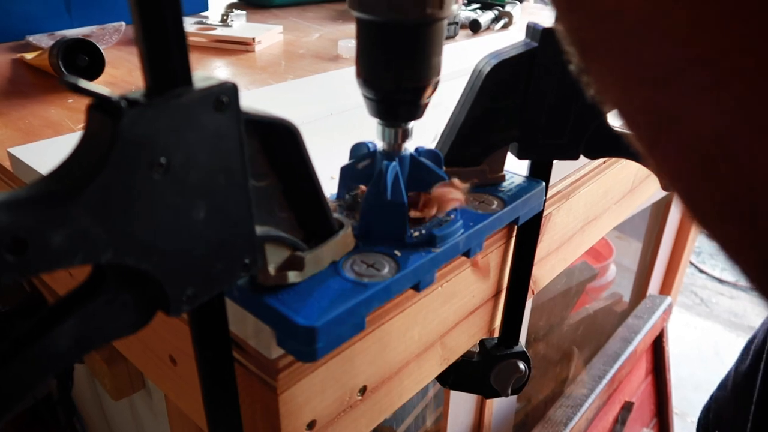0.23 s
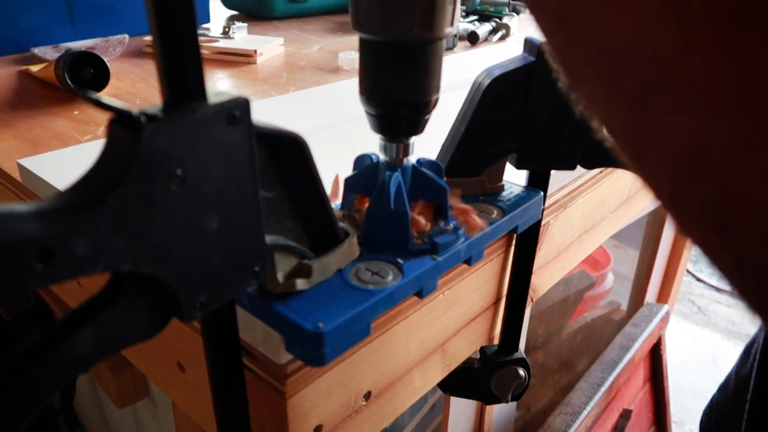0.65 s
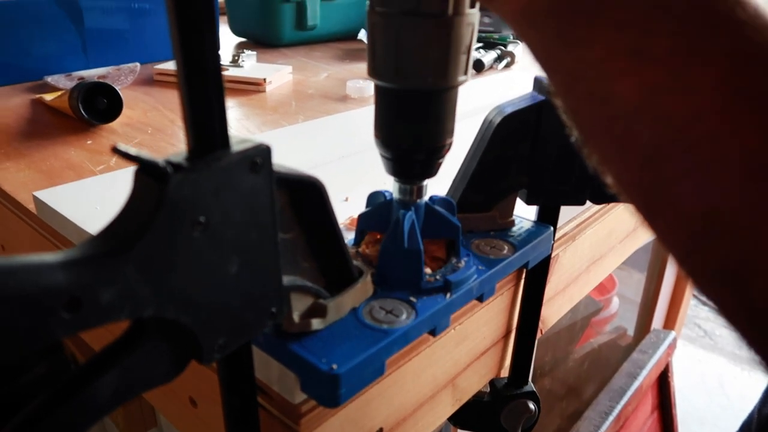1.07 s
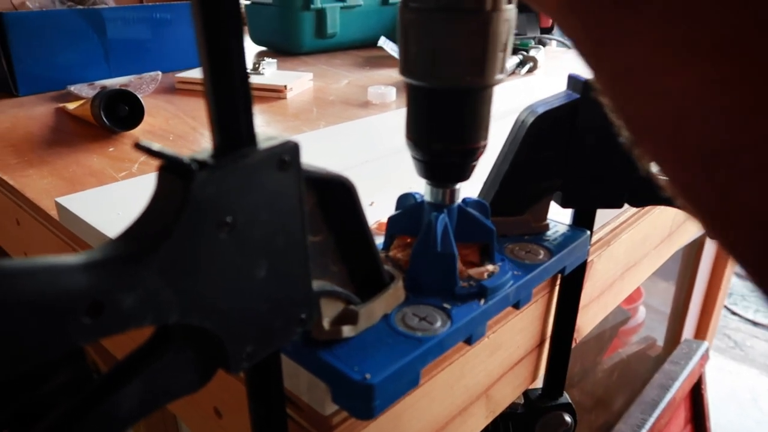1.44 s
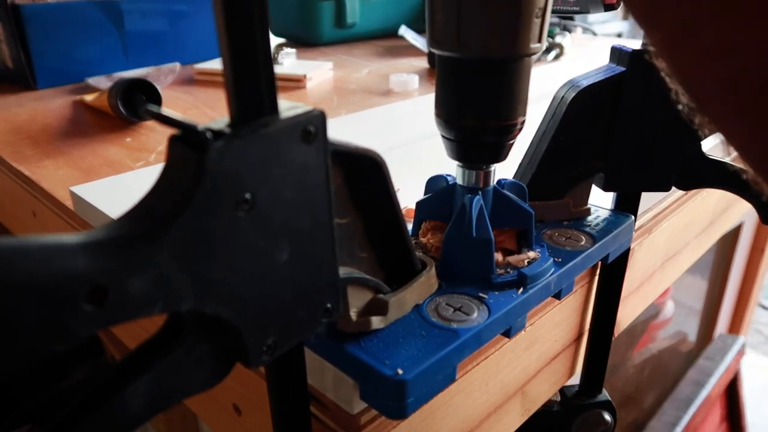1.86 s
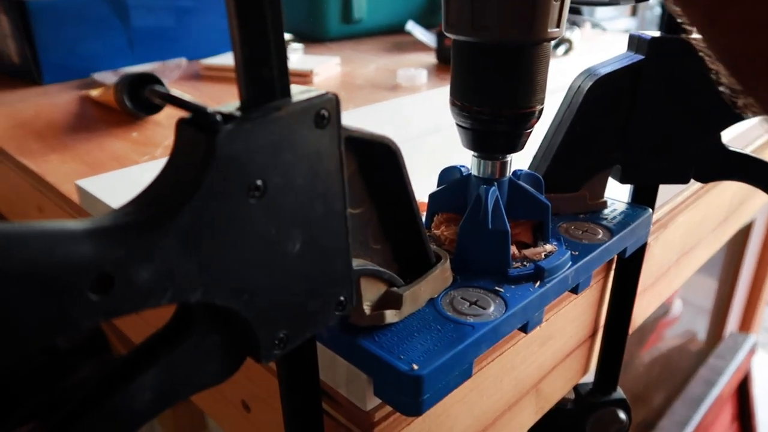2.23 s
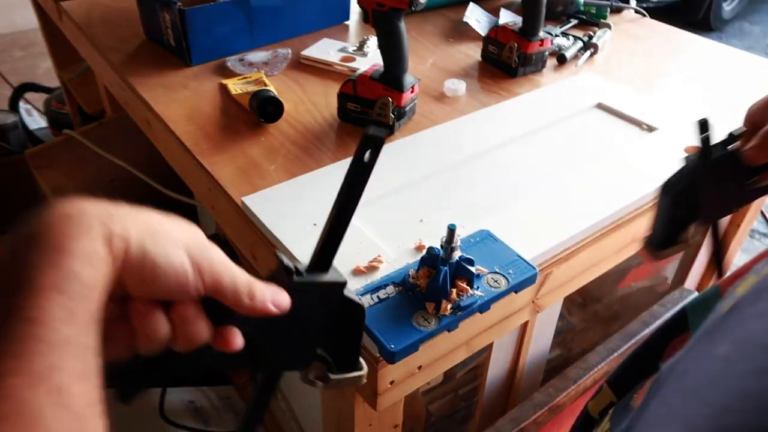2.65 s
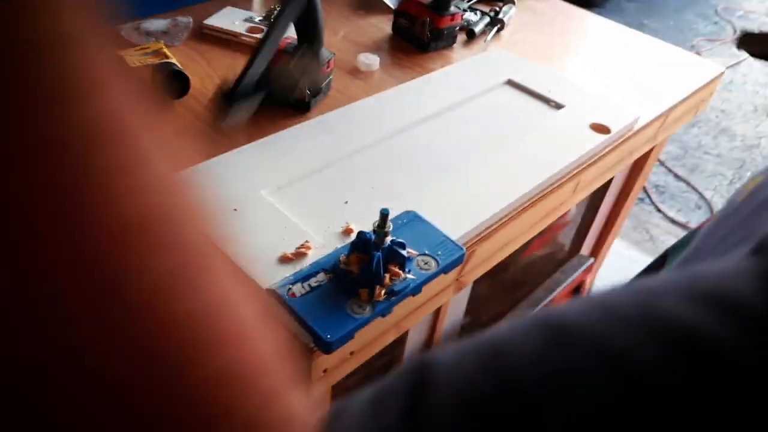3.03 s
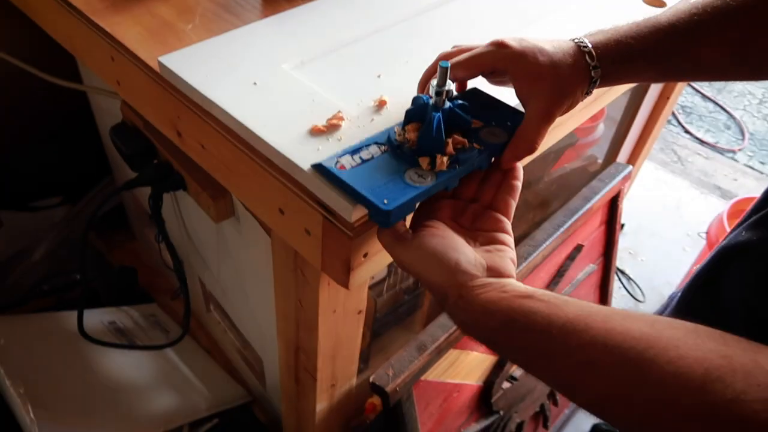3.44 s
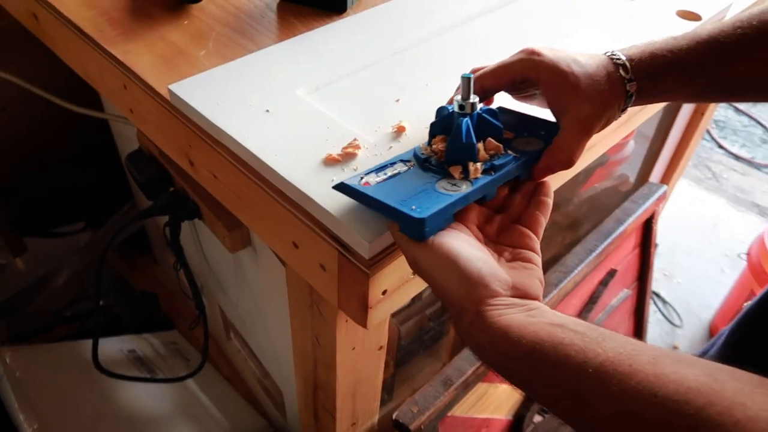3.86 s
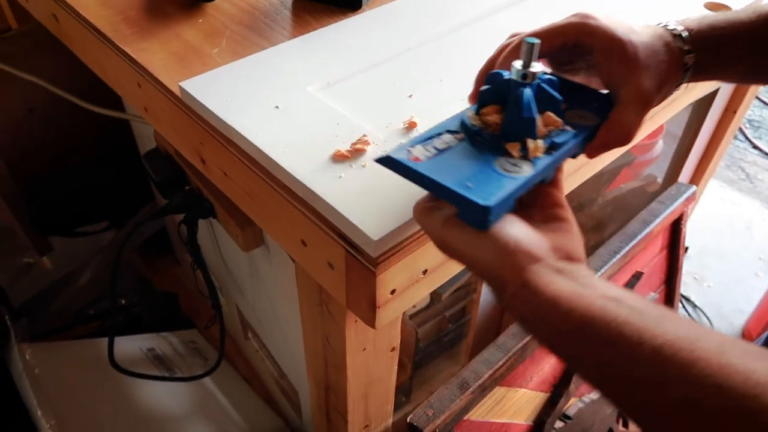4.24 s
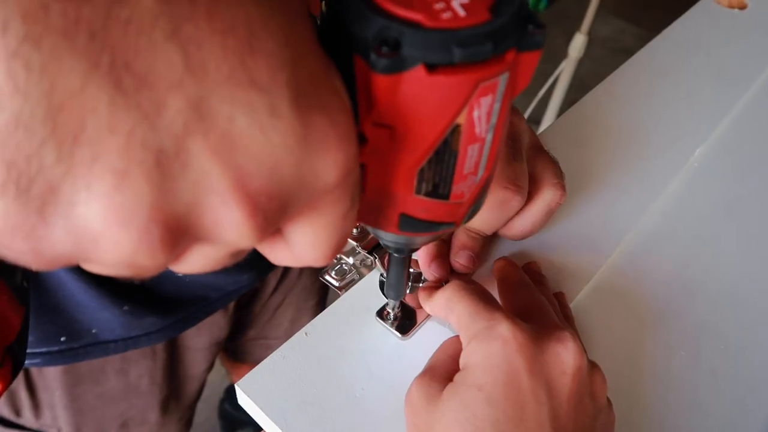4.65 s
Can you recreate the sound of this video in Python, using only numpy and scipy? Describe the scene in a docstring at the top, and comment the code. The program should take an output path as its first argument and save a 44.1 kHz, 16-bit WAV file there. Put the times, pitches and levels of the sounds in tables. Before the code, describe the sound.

From the start, a power drill bores into a wooden door very close to the microphone: a rough mid-range growl with fluttering gear whine, snapping fibres, bright crackling chips and a drumming panel. It is shrillest in the first half second. Uneven bites several times a second drag the pitch down and let it spring back. From about 1.8 seconds the push eases and the motor climbs; at 2.23 it brakes and stops dead. A quiet workshop remains, with low rumble, faint hum and a brief soft hiss around 2.6. At 3.3 to 3.5 a plastic jig scrapes, bumps the bench softly and squeaks; a clear knock lands at 3.78, then faint contacts and a slide near 4.4. At 4.45 bit clicks begin, a driver starts at 4.51, and a very sharp click hits at 4.65. Its humming rotor, rattle and surging gear howl continue to the end, with short reflections.

```python
"""A drill growls and whines as its cutter bores a hinge cup into a wooden door, close by in a workshop.
Each bite drags the motor and its gear tones down; snapping grains make the cut; eased off, it stops dead.
Then a plastic jig scrapes, squeaks and knocks on the door: shaped grains, trembling tones and struck modes.
Last, a driver starts on a hinge screw: howling gear tones, rotor hum, rattle and clicks of the bit.
Low rumble, hum and hiss lie beneath; short reflections surround the tools and hands."""
import sys
import numpy as np
from scipy import signal
from scipy.fft import rfft, irfft
from scipy.io import wavfile

SR = 44100
rng = np.random.default_rng(int(sys.argv[2]) if len(sys.argv) > 2 else 0)


def materialize(psi):
    """Save the field psi as 16-bit PCM at rate SR to the path in sys.argv[1].

    A 1-D psi becomes a single channel; in a 2-D psi each row is a channel.
    """
    bounded = np.clip(np.atleast_2d(psi).T, -1, 1)
    quanta = np.round(bounded * 32767).astype(np.int16)
    wavfile.write(sys.argv[1], SR, quanta)


N = 211225
TIME = np.arange(N) / SR

# Likeness of left and right over the spectrum. Each row: frequency in Hz, likeness as a share.
LIKENESS = [(160, 1), (600, 0.99), (1200, 0.98), (2500, 0.92), (4500, 0.86), (8000, 0.44), (13000, 0.26)]

IDLE_HZ = 809  # drill motor with no load
FIRM_LOAD = 0.31  # share of idle speed lost under a firm push


def gain_of(db):
    """Decibels to amplitude."""
    return 10 ** (np.asarray(db) / 20)


def evened(x):
    """Scaled to rms 1."""
    return x / np.sqrt(np.mean(x ** 2) + 1e-20)


def read(points, hz):
    """Reads a spectrum table on a log-frequency axis."""
    f, value = np.transpose(points)
    return np.interp(np.log(hz + 1), np.log(f + 1), value)


def ramp(start_s, length_s):
    """Rises from 0 to 1, then holds."""
    return np.clip((TIME - start_s) / length_s, 0, 1)


def since(start_s):
    """Seconds since a moment, 0 before it."""
    return np.maximum(TIME - start_s, 0)


def swell(s, half_s):
    """A smooth rise and fall around a moment, peak 1."""
    return np.exp(-np.minimum(((TIME - s) / half_s) ** 2, 60))


def drift(rate_hz):
    """Smooth random wander of rms 1; the rate sets where its spectrum falls away."""
    hz = np.fft.rfftfreq(N, 1 / SR)
    return evened(irfft(rfft(rng.standard_normal(N)) * np.exp(-(hz / rate_hz) ** 2), N))


def noise():
    """Two unrelated white noises."""
    return rng.standard_normal((2, N))


def grains(per_s, spread_db):
    """Random tiny snaps of uneven size, unrelated left and right."""
    size = gain_of(spread_db * np.minimum(rng.exponential(1, (2, N)), 4))
    present = rng.random((2, N)) < per_s / SR
    return evened(size * np.sign(noise()) * present)


def tone(hz, waver_hz, rate_hz):
    """A sine of rms 1 whose pitch trembles."""
    cycles = np.cumsum(hz + waver_hz * drift(rate_hz)) / SR
    return np.sqrt(2) * np.sin(2 * np.pi * (cycles + rng.random()))


def widened(a, b, same):
    """Mixes two unrelated spectra into left and right that are alike by the given share."""
    mid, side = a * np.sqrt(1 + same), b * np.sqrt(1 - same)
    return np.array([mid + side, mid - side])


def coloured(pair, spectrum, resonances=(), diffuse=1):
    """Gives two unrelated drives a spectrum, resonant peaks and stereo width; diffuse = less alike."""
    hz = np.fft.rfftfreq(N, 1 / SR)
    a, b = rfft(pair)
    same = np.clip(read(LIKENESS, hz), 0, 1) ** abs(diffuse)
    shape = gain_of(read(spectrum, hz))
    if len(resonances):
        peaks = sum(gain_of(db) / (1 + 2j * (hz - f) / width) ** 2 for f, width, db in resonances)
        shape = 0.73 * shape + 0.59 * peaks
    return evened(irfft(widened(a, b, same) * shape, N))


def bursts(rows, waver_hz, rate_hz, rough_db):
    """One rough, trembling tone swells and fades at each row, gliding in pitch if the row says so."""
    levels = np.array([gain_of(db) * swell(s, half_s) for s, db, half_s, *pitch in rows])
    pitches = np.array([hz + sum(glide) * np.clip(TIME - s, -2 * half_s, 2 * half_s)
                        for s, db, half_s, hz, *glide in rows])
    level = levels.sum(0)
    pitch_hz = (pitches * levels).sum(0) / level  # the loudest burst rules the pitch
    return level * evened(tone(pitch_hz, waver_hz, rate_hz) * gain_of(rough_db * drift(rate_hz)))


def add(mix, s, sound):
    """Adds a sound at a time."""
    part = mix[:, round(s * SR):][:, :sound.shape[1]]
    part += sound[:, :part.shape[1]]


def strike(rows, modes, crack, crack_s, width, focus_db):
    """Each blow rings one object's modes and a short noisy crack; its brightness sets which band speaks."""
    out, t = np.zeros((2, N)), np.arange(SR // 4) / SR
    hz, db, t60 = np.transpose(modes)[:, :, None]
    bins = np.fft.rfftfreq(len(t), 1 / SR) + 1
    for s, level_db, bright_hz in rows:
        phase = 2 * np.pi * rng.random(hz.shape) + width * rng.standard_normal((2, *hz.shape))
        decay = gain_of(db - focus_db * np.log2(hz / bright_hz) ** 2 - 60 * t / t60)
        ring = (decay * np.sin(2 * np.pi * hz * t + phase)).sum(1)
        contact = rng.standard_normal(len(t)) + width * rng.standard_normal((2, len(t)))
        band = gain_of(-focus_db * np.log2(bins / bright_hz) ** 2)
        contact = evened(irfft(rfft(contact) * band, len(t)))
        blow = ring / abs(ring).max() + crack * contact * np.exp(-t / crack_s)
        blow = blow * (1 - np.exp(-t / 0.000098))  # soften the very first edge
        add(out, s, gain_of(level_db) * blow / abs(blow).max())
    return out


def workshop():
    """Low rumble and a wavering hum come up at about 2.4 s; a soft hiss swells and fades."""
    # Rumble spectrum. Each row: frequency in Hz, density in dB per Hz.
    air = [(15, -58), (25, -26.5), (54, -7), (82, -12), (119, 0), (151, -13), (208, -12.5), (257, -14.5),
           (293, -15), (666, -25.5), (722, -24.5), (1260, -30.5), (1470, -34), (8930, -48.5),
           (14000, -83.5)]
    # Hum tones. Each row: frequency in Hz, level in dB before the trim below.
    hum_tones = [(107, -62.5), (205, -57.5)]
    # Hiss spectrum. Each row: frequency in Hz, density in dB per Hz.
    hiss = [(240, -28), (400, -1.5), (747, -7), (829, -7), (2250, -8.5), (2420, -10), (3840, -7.5),
            (6090, -21), (12600, -29.5), (14000, -34.5)]
    room_db, room_start_s, room_rise_s, room_under_db = -53, 2.374, 0.12, -17.5
    hiss_start_s, hiss_rise_s, hiss_db, hiss_fade_s, hiss_rest_db = 2.307, 0.26, -55.5, 0.21, -70
    hum_trim_db = -1.0

    level = gain_of(room_under_db * (1 - ramp(room_start_s, room_rise_s)))
    hum = sum(gain_of(db + hum_trim_db) * tone(hz, 2.534, 14.2) for hz, db in hum_tones)
    rumble = gain_of(room_db) * coloured(noise(), air, diffuse=34.0)
    fade = np.exp(-since(hiss_start_s + hiss_rise_s) / hiss_fade_s)
    passing = gain_of(hiss_db) * ramp(hiss_start_s, hiss_rise_s) ** 2 * fade
    hiss_level = passing + gain_of(hiss_rest_db) * level
    return (rumble + hum) * level + coloured(noise(), hiss, diffuse=24.0) * hiss_level


def walls(x):
    """Dense reflections, each band dying at its own speed, most alike left and right in the bass."""
    # Decay of the room. Each row: frequency in Hz, time to fall by 60 dB in seconds.
    decay_times = [(150, 0.56), (600, 0.25), (2500, 0.21), (6000, 0.181), (12000, 0.13)]
    taps = rng.standard_normal((2, SR // 2)) * (rng.random((2, SR // 2)) < .08)
    taps[:, :round(.004 * SR)] = 0  # gap in seconds before the first reflection
    hz, t, (a, b) = signal.stft(taps, SR, nperseg=256)
    same = np.clip(read(LIKENESS, hz), 0, 1)[:, None] ** 3
    bands = widened(a, b, same) * gain_of(-60 * t / read(decay_times, hz)[:, None])
    tail = signal.istft(bands, SR, nperseg=256)[1]
    return signal.fftconvolve(x, tail / np.linalg.norm(tail[0]), axes=1)[:, :N]


def bench_bumps():
    """The door bumps on the bench: soft, low blows ring the bench modes."""
    # Bumps. Each row: time in seconds, peak in dB, brightest frequency in Hz.
    bumps = [(3.380, -35, 290), (3.394, -39, 300), (3.409, -43, 280)]
    # Bench modes. Each row: frequency in Hz, relative level in dB, time to fall by 60 dB in seconds.
    bench = [(141, 8.5, 0.15), (228, 2.5, 0.14), (276, 8, 0.048), (390, -3, .09), (520, -15, .06)]
    return strike(bumps, bench, crack=0.11, crack_s=0.0084, width=.05, focus_db=5.0)


def jig_scrape():
    """The jig slides under the hands: sparse grains ring its hollow while a stroke lasts."""
    # Strokes. Each row: start in seconds, length in seconds, level in dB.
    slides = [(3.27, 0.089, -50), (3.455, 0.033, -55), (3.605, 0.029, -59.5), (3.685, 0.056, -59.5),
              (3.746, 0.1, -63), (4.39, 0.16, -60)]
    # Scrape spectrum. Each row: frequency in Hz, density in dB per Hz.
    scrape = [(240, 3), (400, 1.5), (829, -8.5), (891, -11), (1440, -6), (2170, -8.5), (3100, -9),
              (4200, -17.5), (5120, -25), (6500, -26), (8000, -30), (13000, -35)]
    # Hollow ring of the jig. Each row: frequency in Hz, width in Hz, level in dB.
    hollow = [(1508, 280, -5), (1912, 190, -8), (3040, 450, -14)]
    attack_s, release_s = 0.02, 0.018
    strokes = sum(gain_of(db) * ramp(s, attack_s) * np.exp(-since(s + length) / release_s)
                  for s, length, db in slides)
    return coloured(grains(870, 2.6), scrape, hollow, diffuse=2.4) * strokes * gain_of(2.0 * drift(90))


def jig_squeak():
    """Plastic sticks and slips on the door for a moment: rough tones with a trembling pitch."""
    # Squeak tones. Each row: frequency in Hz, level in dB.
    squeak_tones = [(1650, -61), (3700, -69)]
    start_s, length_s = 3.474, 0.029
    level = ramp(start_s, 0.0032) * np.exp(-since(start_s + length_s) / 0.0068)
    return level * sum(gain_of(db + 5.2 * drift(120)) * tone(hz, 0.049 * hz, 416) for hz, db in squeak_tones)


def jig_knocks():
    """The jig knocks on the door: each contact rings the plastic's modes."""
    # Knocks. Each row: time in seconds, peak in dB, brightest frequency in Hz.
    knocks = [(2.427, -53.5, 2200), (3.282, -46, 1515), (3.295, -51, 3070), (3.367, -52, 7040),
              (3.374, -45, 1410), (3.712, -48, 1500), (3.7805, -28, 1870), (3.786, -33, 1250),
              (3.798, -44, 1690), (3.912, -45.5, 1990), (4.34, -50, 1782)]
    # Modes of the jig on the door. Each row: frequency in Hz, relative level in dB, 60 dB decay in seconds.
    jig = [(681, 19, 0.067), (827, 0, 0.071), (1074, 3, 0.038), (1243, -2, 0.064), (1450, 5, 0.049),
           (1660, -3, 0.063), (1820, 2, 0.04), (2040, -3, 0.047), (2350, -3, 0.027), (2800, -11, 0.027),
           (3460, -3, 0.048)]
    return strike(knocks, jig, crack=0.39, crack_s=0.0021, width=0.27, focus_db=13)


def handling():
    """Hands shift the jig on the door, and the door bumps on the bench."""
    return jig_scrape() + jig_squeak() + jig_knocks() + bench_bumps()


def bit_clicks():
    """The bit clicks in the screw head: hard blows ring the steel very briefly."""
    # Clicks. Each row: time in seconds, peak in dB, brightest frequency in Hz.
    clicks = [(4.4495, -23, 5000), (4.518, -33, 3200), (4.5555, -20.5, 3800), (4.5558, -25, 10300),
              (4.6472, -10, 5060), (4.6478, -16, 2600), (4.6488, -11.5, 1500)]
    # Modes of bit and hinge. Each row: frequency in Hz, relative level in dB, 60 dB decay in seconds.
    steel = [(1430, -2, 0.016), (2920, -21, .014), (3590, 2, 0.015), (4100, 9.5, 0.0082),
             (5430, -10, 0.029), (6000, -1, 0.016), (7350, -24, 0.011), (8660, -16, .014),
             (10940, 5, 0.017)]
    return strike(clicks, steel, crack=0.67, crack_s=0.0018, width=0.49, focus_db=14.5)


def driver_whistle():
    """The speed controller whistles, one note for each trigger step."""
    # Trigger steps. Each row: start in seconds, pitch in Hz, level in dB.
    trigger_steps = [(4.512, 7970, -56.5), (4.668, 7800, -51)]
    step_s, step_hz, step_db = np.transpose(trigger_steps)
    step = np.maximum(np.searchsorted(step_s, TIME) - 1, 0)
    return gain_of(step_db[step]) * tone(step_hz[step], 23.9, 30.3)


def driver_rotor(speed, start_s):
    """The rotor hums in tones tied to its speed, dipping as the bit unseats once a turn."""
    # Rotor tones. Each row: frequency at full speed in Hz, relative level in dB.
    rotor_tones = [(104, -20), (154, -2.5), (204.6, 5.5), (231, -4.5), (307, -4), (614, -10)]
    level_db, delay_s, attack_s = -32, 0.035, 0.023
    dip_s, dip_rate_hz, dip_depth = 4.585, 22.2, 0.59  # moment of a dip, dips per second, share lost
    hum = evened(sum(gain_of(db) * tone(hz * speed, 0.0259 * hz, 55.4) for hz, db in rotor_tones))
    seated = 1 - dip_depth * np.cos(np.pi * dip_rate_hz * (TIME - dip_s)) ** 4
    return hum * seated * gain_of(level_db + 1.8 * drift(42)) * ramp(start_s + delay_s, attack_s)


def driver_rattle(speed, howl):
    """Dense grains pulse once per rotor turn, louder when the screw binds and fluttering at random."""
    # Rattle spectrum. Each row: frequency in Hz, density in dB per Hz.
    rattle = [(53, -51), (100, -5.5), (210, -16), (400, -15), (603, -26), (714, -22), (901, -16),
              (1070, -24), (1210, -12.5), (1500, -4), (2010, -19.5), (2760, -11.5), (5910, -28.5),
              (7950, -28.5), (14100, -46.5)]
    level_db, bind_db, flutter_db = -32, 1.5, 1.5
    turn = np.cumsum(204.6 * speed) / SR % 1  # position within a turn; full-speed rate in Hz
    pulsed = grains(9000, 0.96) * (1.0 + np.exp(-turn / 0.14))
    level = gain_of(level_db + bind_db * howl / howl.max() + flutter_db * drift(88))
    return level * coloured(pulsed, rattle)


def driving():
    """The driver comes in at about 70% speed and climbs quickly; its gears howl whenever the screw binds."""
    # Gear tones. Each row: frequency at full speed in Hz, relative level in dB.
    gear_tones = [(1244, -4.5), (1305, -6), (1424, -20), (1486, -5), (1534, 6.5), (1583, -2), (1635, -0.5)]
    # Surges as the screw binds. Each row: time in seconds, level in dB, half-length in seconds.
    surges = [(4.54, -32, 0.0046), (4.596, -28, .015), (4.627, -36, 0.0047), (4.668, -24.5, .0037),
              (4.682, -26.5, 0.0065), (4.749, -24, 0.01), (4.779, -29, 0.025)]
    start_s, climb_s, start_slow = 4.512, .018, 0.24  # start_slow: share of full speed, soon made up
    creep_per_s = .17  # share of full speed gained per second
    calm_db, attack_s = -37, 0.016  # gears between surges; build-up of gears and rattle

    running = since(start_s)
    speed = 1 - start_slow * np.exp(-running / climb_s) - creep_per_s * (running[-1] - running)
    howl = gain_of(calm_db) + sum(gain_of(db) * np.exp(-((TIME - s) / half_s) ** 2) for s, db, half_s in surges)
    gears = howl * evened(sum(gain_of(db) * tone(hz * speed, 9, 70) for hz, db in gear_tones))
    build_up = (1 - np.exp(-running / attack_s)) ** 2
    geared = (gears + driver_rattle(speed, howl)) * build_up
    return geared + driver_rotor(speed, start_s) + driver_whistle() * (running > 0)


def drill_controller(motor_hz, braked):
    """The speed controller's switching tone and its motor-spaced sidebands rise slowly, then cut out."""
    # Switching tone: frequency in Hz, full level in dB.
    switch_hz, switch_db = (7927, -57)
    # Sidebands. Each row: distance in motor frequencies, full level in dB.
    sidebands = [(0.98, -52.5), (-1, -81)]
    carrier = gain_of(switch_db) * tone(switch_hz, 1.5, 30)
    sides = sum(gain_of(db + 2 * drift(39.85)) * tone(switch_hz + k * motor_hz, 2.7, 60) for k, db in sidebands)
    return (carrier + sides) * ramp(0, .85) ** 2 * gain_of(-900 * braked)


def cutting():
    """The motor frequency between bites, and the share of it that the cutter's lips take as they bite."""
    # How hard the drill is pushed. Each row: time in seconds, motor frequency between bites in Hz.
    feed = [(0.0, 487), (0.015, 532), (0.04, 523), (0.09, 453), (0.17, 454), (0.24, 431), (0.33, 426),
            (0.39, 528), (0.53, 530), (0.64, 553), (0.73, 584), (0.83, 565), (0.93, 553), (1.1, 556),
            (1.19, 600), (1.29, 605), (1.41, 570), (1.59, 533), (1.77, 511), (1.825, 607), (1.9, 650),
            (1.98, 685), (2.08, 714), (2.2, 723)]
    # Bites of a cutter lip. Each row: time in seconds, share of speed lost, half-length in seconds.
    bites = [(0.064, 0.136, 0.013), (0.13, 0.193, 0.018), (0.204, 0.179, 0.016), (0.282, 0.127, 0.022),
             (0.379, 0.147, 0.008), (0.414, 0.106, 0.009), (0.454, 0.169, 0.011), (0.498, 0.184, 0.017),
             (0.565, 0.274, 0.015), (0.676, 0.206, 0.015), (0.785, 0.227, 0.017), (0.854, 0.06, 0.01),
             (0.901, 0.209, 0.017), (0.959, 0.092, 0.017), (1.014, 0.22, 0.014), (1.076, 0.06, 0.014),
             (1.125, 0.158, 0.014), (1.233, 0.173, 0.016), (1.437, 0.188, 0.015), (1.498, 0.049, 0.012),
             (1.553, 0.257, 0.017), (1.612, 0.166, 0.017), (1.677, 0.252, 0.014), (1.738, 0.077, 0.011),
             (1.851, 0.097, 0.017), (1.934, 0.045, 0.023), (2.026, 0.033, 0.019), (2.25, 0.156, 0.031)]
    s, hz = np.transpose(feed)
    drag = sum(share * swell(bite_s, half_s) for bite_s, share, half_s in bites)
    return np.interp(TIME, s, hz), drag


def door_thump(load, braked):
    """Deep thumping of the door, strong only under a firm push."""
    # Thump spectrum. Each row: frequency in Hz, density in dB per Hz.
    thump = [(30, -34), (62, -20), (100, 3), (125, -4), (220, -28.5), (500, -90.5)]
    firmness = np.clip(load / FIRM_LOAD, 0, 1) ** 2
    return coloured(noise(), thump) * firmness * gain_of(-55 - 314 * braked)


def door_drum(motor_hz, flutter):
    """Snapping fibres drum the clamped door; the motor's hum rings it wherever it meets a resonance."""
    # Cut heard through the door. Each row: frequency in Hz, density in dB per Hz.
    door = [(59, -36.5), (100, -24.5), (135, -26.5), (161, -7), (254, -7.5), (351, -1), (389, -8.5),
            (537, 0), (611, -5.5), (661, -3.5), (856, -10), (1280, -13), (1380, -10.5), (1980, -15.5),
            (2200, -9.5), (2860, -28), (4840, -120)]
    # Ringing of the door. Each row: frequency in Hz, width in Hz, level in dB.
    panel = [(180, 35, -11), (217.3, 25, -11), (353, 41, -9), (542, 110, -6), (657.6, 31, -7.5),
             (980, 180, -17), (1395, 40, -11.5)]
    # Shaking of the drill. Each row: multiple of the motor frequency, relative level in dB.
    shaft = [(.25, -23.5), (.335, -26)]
    motor_db = -7.5
    shake = sum(gain_of(db) * tone(k * motor_hz, 11.0, 47.9) for k, db in shaft)
    ringing = sum(gain_of(db) / (1 + (2 * (motor_hz - hz) / width) ** 2) for hz, width, db in panel)
    shake = shake + gain_of(motor_db) * ringing * tone(motor_hz, 6, 50)
    return 1.192 * coloured(grains(3500, 1.0) * flutter, door, panel) + shake


def door_judder():
    """The door judders under the cutter in low trembling tones."""
    # Judders. Each row: time in seconds, level in dB, half-length in seconds, pitch in Hz.
    judders = [(.024, -27.5, 0.013, 527.5), (.122, -28, 0.015, 525.4), (.169, -30.5, 0.0078, 526.5),
               (.252, -22.5, 0.011, 535), (.345, -25, .011, 551.8), (.408, -29, 0.014, 599.3),
               (.515, -31, 0.027, 656), (.574, -25.5, 0.013, 555), (.76, -33.5, 0.025, 532.6),
               (.96, -32.5, 0.033, 560), (1.362, -28.5, .012, 530), (1.473, -28.5, .011, 531),
               (1.56, -33, .022, 560), (1.67, -33.5, 0.018, 345), (1.705, -31, .016, 555),
               (1.742, -33, .016, 652)]
    return bursts(judders, waver_hz=27.6, rate_hz=130, rough_db=2.0)


def wood_tearing(flutter):
    """Fibres snap at the cutter's edge: fluttering grains."""
    # Cutter spectrum. Each row: frequency in Hz, density in dB per Hz.
    cutter = [(1120, -37.5), (1900, -6.5), (2020, -20), (2290, -3.5), (2580, 0), (3470, -2.5), (4590, -15),
              (5000, -34.5), (6500, -35.5), (11000, -120)]
    return coloured(grains(3500, 2.1) * flutter, cutter)


def flying_chips():
    """Chips crackle brightly: denser grains in the treble."""
    # Chip spectrum. Each row: frequency in Hz, density in dB per Hz.
    chips = [(2650, -14.5), (4500, -1), (6220, -1), (7150, -6.5), (8560, -10.5), (12500, -18.5),
             (14100, -31)]
    return coloured(grains(7000, 1.8), chips)


def gear_whine(motor_hz, load):
    """Gear teeth mesh unevenly: multiples of the motor frequency flutter through the housing's resonances."""
    # Whines. Each row: multiple of the motor frequency, dB under a firm push before the housing,
    # dB more per unit of load.
    mesh = [(2.58, 1, 0), (4, -1.5, -16), (5, .5, 26), (6, -12, 0), (7, .5, 18), (8, -4.5, 10), (10, -9, 0)]
    # What the drill's housing lets out. Each row: frequency in Hz, level in dB.
    housing = [(1100, -16), (1380, -4), (1560, -12), (1750, -10.5), (2000, -17), (2220, -4.5), (2400, 2),
               (2600, 2), (2810, -1), (3050, -3.5), (3550, -3.5), (3800, -9.5), (4200, -8), (5000, -22),
               (8000, -13.5)]
    whine = 0
    for k, db, by_load in mesh:
        level_db = db + by_load * (load - FIRM_LOAD) + read(housing, k * motor_hz) + 2.8 * drift(70)
        whine = whine + gain_of(level_db) * tone(k * motor_hz, 3.3 * k, 200)
    return whine


def loaded_gear_whine_bursts():
    """Heavily loaded gears whine in gliding bursts, ringing the drill's housing near 2600 Hz."""
    # Loaded gear whine bursts. Each row: time in seconds, level in dB, half-length in seconds,
    # pitch in Hz, glide in Hz per s.
    whine_bursts = [(.024, -26, .014, 2596, 0), (.054, -24, .012, 2730, -9000),
                    (.133, -24, 0.023, 2605, -4500), (.207, -26, 0.022, 2590, -5000),
                    (.248, -29, 0.00894, 2350, -2000), (.279, -28.5, .01, 2590, -7000),
                    (.305, -25.5, 0.014, 2570, 9001), (.367, -28, 0.0094, 2570, -9000),
                    (.436, -29.5, 0.012, 2570, -8000)]
    return bursts(whine_bursts, waver_hz=85, rate_hz=300, rough_db=2.5)


def boring():
    """Each bite loads the motor: fibres snap, the door drums, and the gear and motor tones sag together."""
    # Each level: dB when idle, dB more at a stall, dB more per unit of drag.
    door_level, cutter_level, chips_level = (-34.5, 6.8, 0), (-34, 0.9, 14), (-41.5, 2, 4.3)
    # Gear whine level: dB when idle, dB more at a stall, dB more per unit of drag.
    gear_level = (-38.6, 5, 15)
    release_s, slack_s, slack_db_per_s = 2.233, 2.12, 170  # brake catches; push eases and gears fade
    entry_db, gear_entry_db, entry_s = 3, 3, 0.48  # shrillest until the cutter has sunk in
    flutter_turns, flutter_depth = .16, 0.22  # cycles per motor cycle, share

    free_hz, drag = cutting()
    braked = since(release_s)  # seconds since the brake caught
    motor_hz = free_hz * (1 - drag) * (1 + 0.0037 * drift(70)) * np.exp(-braked / 0.2)
    load = 1 - free_hz / IDLE_HZ
    door_db, cutter_db, chips_db, gear_db = (
        idle + by_load * load + by_drag * drag
        for idle, by_load, by_drag in (door_level, cutter_level, chips_level, gear_level))
    entry = np.exp(-(TIME / entry_s) ** 2)
    tear_db = 1.0 * drift(60)  # uneven grain of the wood
    # the cut flutters in step with the gearbox
    flutter = 1 + flutter_depth * np.cos(2 * np.pi * np.cumsum(flutter_turns * motor_hz) / SR)

    door_db = door_db + 0.12 * entry_db * entry + tear_db + 0.89 * drift(30)
    cutter_db = cutter_db + entry_db * entry + 0.48 * tear_db
    chips_db = chips_db + 0.82 * entry_db * entry + 1.1 * tear_db
    gear_db = gear_db + gear_entry_db * entry - slack_db_per_s * since(slack_s)
    # after the brake catches, each layer falls at its own rate in dB per second
    door = door_drum(motor_hz, flutter) * gain_of(door_db - 314 * braked)
    cutter = wood_tearing(flutter) * gain_of(cutter_db - 430 * braked)
    chips = flying_chips() * gain_of(chips_db - 580 * braked)
    gears = gear_whine(motor_hz, load) * gain_of(gear_db - 460 * braked)
    wood = door + door_thump(load, braked) + door_judder() + cutter + chips
    return wood + gears + loaded_gear_whine_bursts() + drill_controller(motor_hz, braked)


def scene():
    """The tools and hands close by, their reflections and the workshop around them."""
    tools = boring() + driving() + bit_clicks()
    hands = handling()
    reflections = walls(gain_of(-13.5) * tools + gain_of(-11.5) * hands)
    balance = gain_of([[-.15], [.15]])  # leans slightly to the right
    return (tools + hands + reflections + workshop()) * balance


def record(dry):
    """A steep low-pass filter closes off the top of the treble."""
    edge_hz = 14300
    low_pass = signal.firwin(255, edge_hz, window=("kaiser", 8), fs=SR)
    return signal.oaconvolve(dry, low_pass[None], "same")


dry = scene()
out = record(dry)
materialize(out)
```